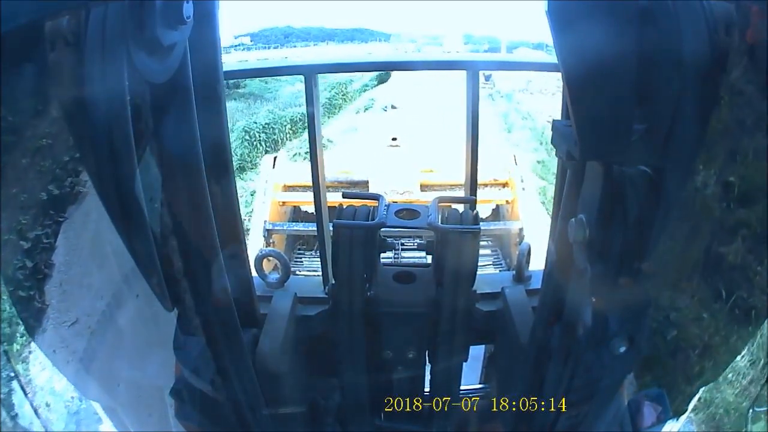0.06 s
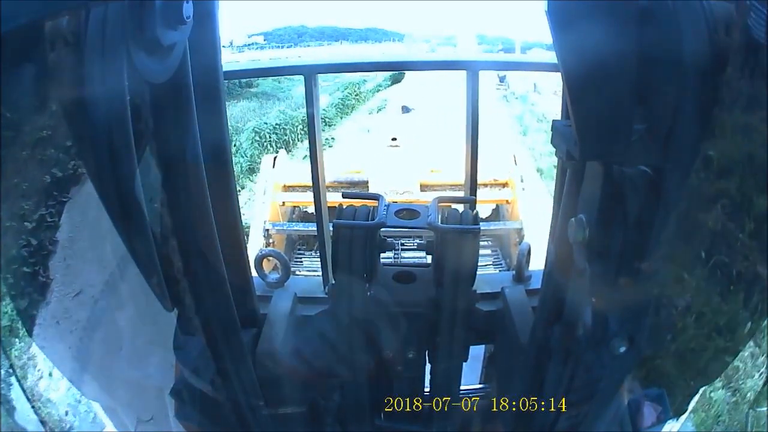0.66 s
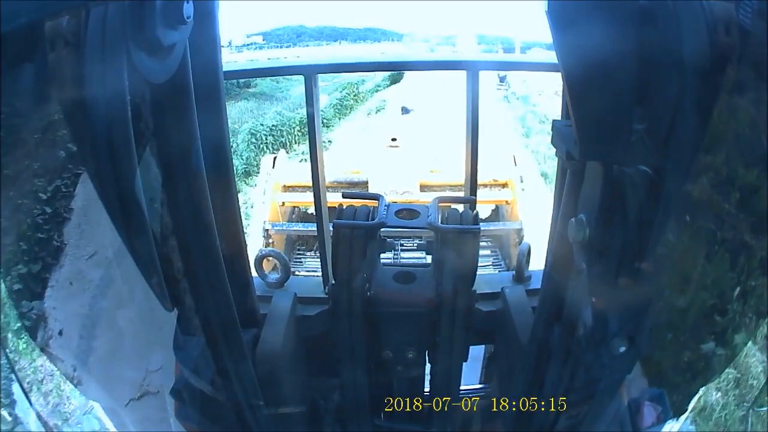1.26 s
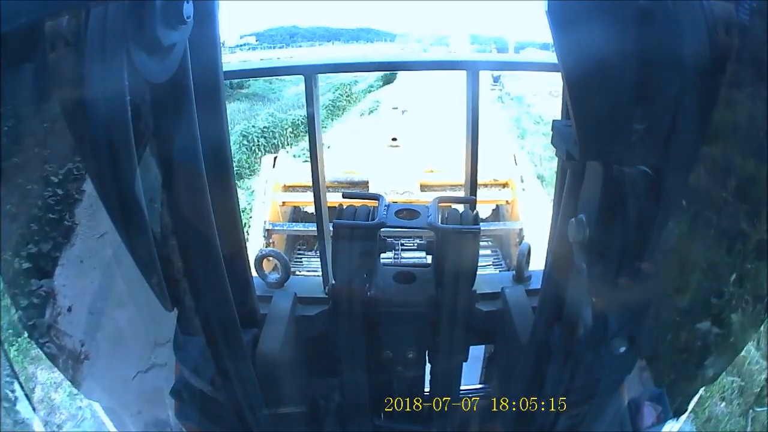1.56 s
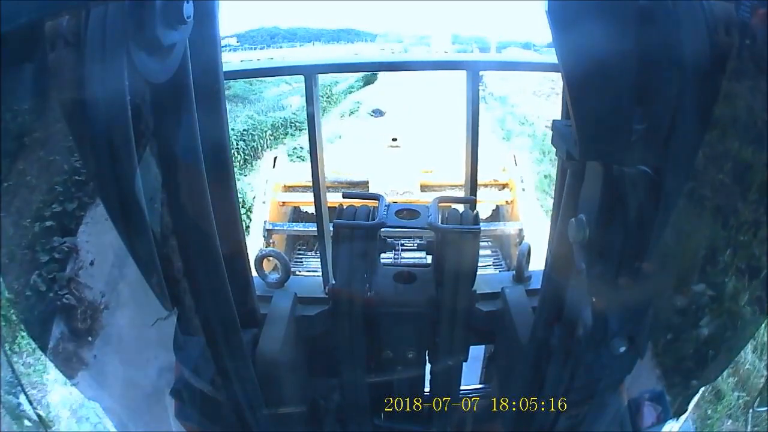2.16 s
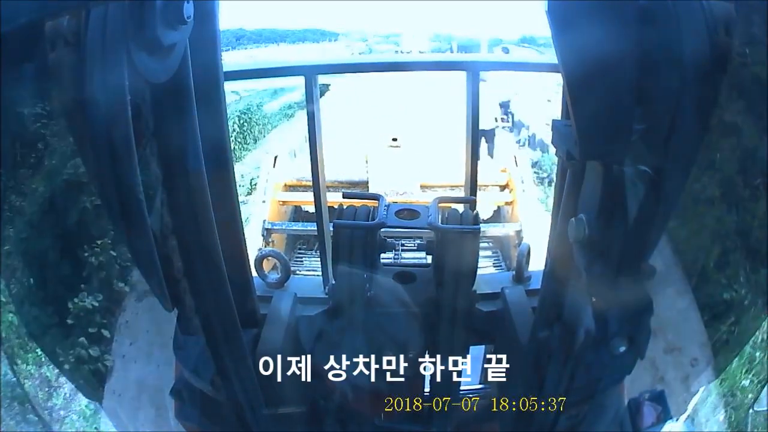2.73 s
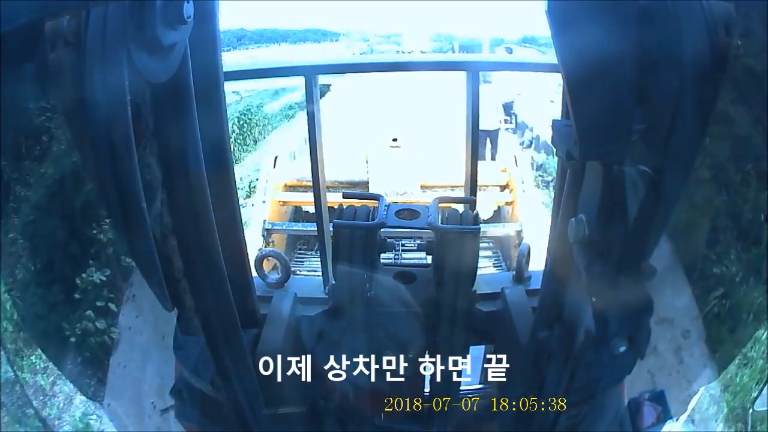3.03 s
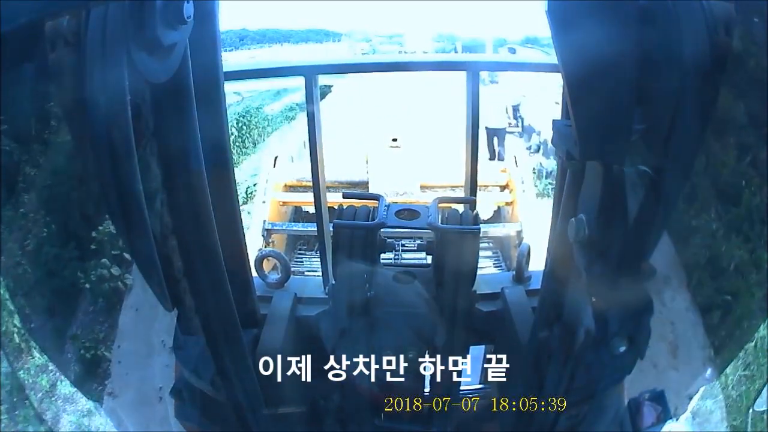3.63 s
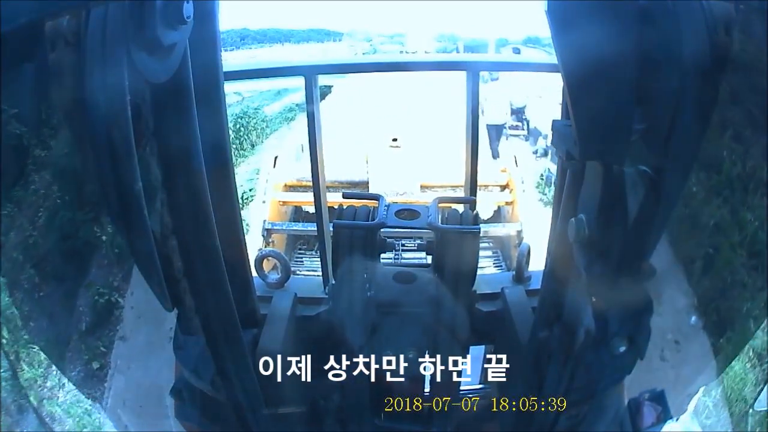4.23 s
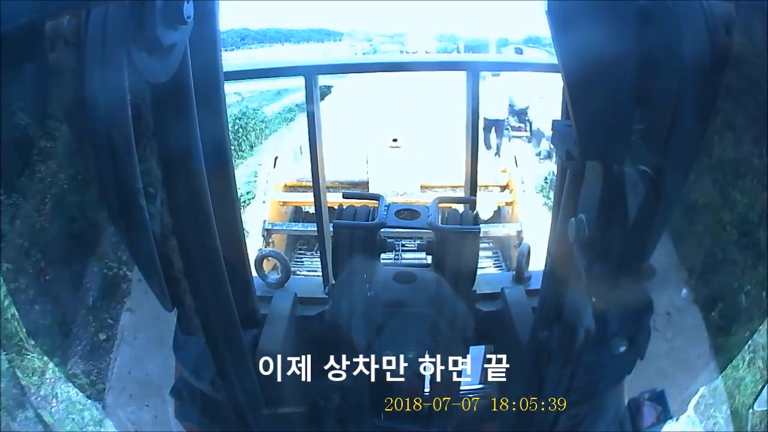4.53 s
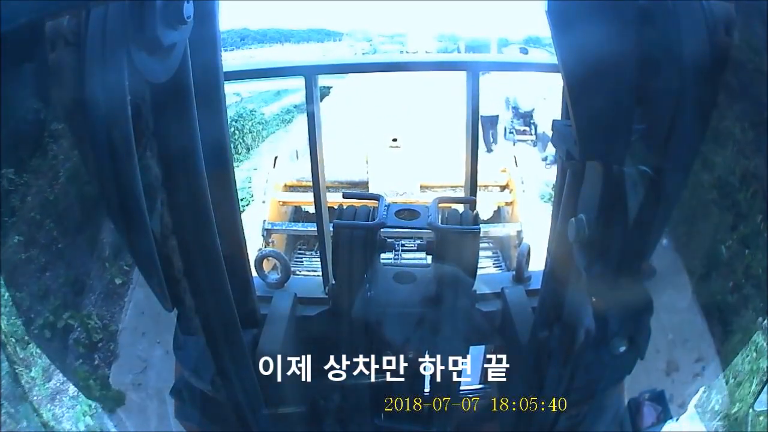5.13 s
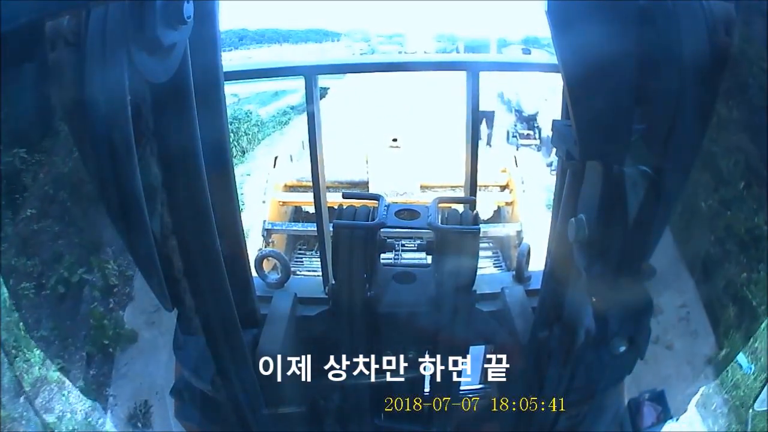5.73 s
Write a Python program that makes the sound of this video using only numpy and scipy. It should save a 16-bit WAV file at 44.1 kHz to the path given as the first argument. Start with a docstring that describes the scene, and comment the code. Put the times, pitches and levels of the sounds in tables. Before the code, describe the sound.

Steady diesel drone, rattle and tyre rumble aboard a moving forklift, with faint squeaks, one sharp click and a growing throb.

```python
"""On a lane, in the driver's seat of a forklift whose four-cylinder diesel pulls at about 1600 rpm.
Low crank orders (harmonics of the shaft's rotation) boom in the frame and beat three times a second;
from about three seconds on, this throb grows stronger. Impacts rattle the block in a pattern that
partly repeats every two turns; tyres rumble, gears whine, a fan drones and the mast squeaks.
A small microphone passes little above 4 kHz; only one sharp click keeps its treble."""
import sys
import numpy as np
from scipy import signal
from scipy.fft import rfft, irfft
from scipy.io import wavfile
from scipy.ndimage import uniform_filter1d

SR = 44100
rng = np.random.default_rng(int(sys.argv[2]) if len(sys.argv) > 2 else 0)


def file_out(sig):
    """Save sig as 16-bit WAV at sys.argv[1]."""
    # one column per channel
    cols = np.atleast_2d(sig).T
    # limit, then scale
    lim = np.clip(cols, -1, 1)
    pcm = np.round(lim * 32767).astype(np.int16)
    wavfile.write(sys.argv[1], SR, pcm)


N = 259308
TIME = np.arange(N) / SR

# rotation of the crankshaft: (time [s], speed [turns/s])
CRANK_SPEED = [(0, 26.01), (0.3, 26.03), (0.8, 26.71), (1.25, 27.1), (1.65, 26.66), (2.07, 27.32),
               (2.35, 27.08), (2.67, 27.24), (2.9, 26.62), (3.4, 26.7), (4.1, 26.61), (4.45, 26.74),
               (5.05, 26.54), (5.6, 26.68), (5.88, 26.49)]
# strong crank orders: (time [s], order 2 level [dB], order 3 level [dB], order 5 level [dB])
BOOM_LEVELS = [(0.0, -16, -40, -19), (0.45, -20.5, -30.2, -20), (0.8, -15.4, -29.5, -19.5),
               (1.15, -14, -21.5, -17), (1.6, -19, -31.5, -20.5), (2.05, -17.5, -16.5, -15),
               (2.45, -27, -22, -16.5), (3.05, -19.3, -14.5, -15), (4.4, -18, -15.8, -15.5),
               (5.0, -20, -18, -15.5), (5.88, -15.5, -14, -16)]
# tones beside the orders: (crank order, side [-1 below, 1 above], relative level [dB], swell delay [s])
BEAT_TONES = [(3, 1, -22.5, 0), (3, -1, -28, -.04), (6, 1, -26, .08), (6, -1, -25.5, .09),
              (8, 1, -32, -.03), (8, -1, -33, -.03)]
# effect of engine load: (time [s], clatter level [dB], rumble level [dB], hum gain [dB])
LOAD_LEVELS = [(0, -19, -20.5, -4.5), (.7, -18, -19, -6.5), (1.5, -18.5, -19, -3), (2.4, -18.5, -20, -2.5),
               (2.9, -18.5, -19.5, -0.5), (4.2, -19, -19, -1), (5.88, -18.5, -18.5, -0.5)]
# weaker crank orders: panel vibrations, and at orders 29, 30 and 43 further gear lines: (crank order, relative
# level [dB])
HUM_ORDERS = [(1, -31), (4, -31.5), (8, -33.5), (10, -27.5), (12, -34), (29, -40.5), (30, -34.5), (43, -35),
              (80, -50)]
# impacts within one turn: (position [turns], half-width [turns], relative level [dB])
IMPACTS = [(.4, 0.11, -10), (0.652, .12, -7)]
# broad response of the block and its covers: (frequency [Hz], relative level [dB])
BLOCK_SPECTRUM = [(200, -21), (400, -11.5), (500, 1.5), (650, -6.5), (820, -2), (950, -3), (1110, 0),
                  (1420, -0.5), (1720, -6), (1860, -17), (2170, -13), (2400, -24), (2800, -23),
                  (3300, -29.5)]
# resonances of the gear cover and other thin steel: (frequency [Hz], bandwidth [Hz], gain [dB])
COVER_MODES = [(794, 20, 2), (1086, 63, 6), (1135, 34, 0.5), (1373, 59, 3), (2800, 90, 3.5)]
# tyre and frame noise: (frequency [Hz], relative level [dB])
RUMBLE_SPECTRUM = [(20, -28), (40, -22), (62, -1), (76, -1), (105, -10), (140, -4), (175, -2), (205, -3),
                   (245, -9), (330, -6), (430, -11), (700, -28.5), (1500, -50.5)]
# whine of the camshaft gear: (time [s], level [dB])
CAM_LEVELS = [(0.0, -24), (0.3, -19.5), (0.8, -24), (1.0, -29.5), (1.3, -25), (1.65, -27), (2.2, -22.5),
              (2.8, -30.5), (3.75, -33), (4.0, -25), (5.0, -30.5), (5.88, -26.5)]
# mast squeaks: (centre time [s], duration [s], start frequency [Hz], end frequency [Hz], level [dB])
MAST_SQUEAKS = [(.657, .09, 722, 732, -22), (.645, .08, 985, 1010, -25), (.825, .11, 715, 675, -27),
                (1.005, .11, 712, 704, -27), (1.7, .1, 760, 720, -30)]
# sharp click: (time [s], peak level before filtering [dB])
CLICK_PULSES = [(2.8035, -4)]


def exhaust_boom(turns, sixth_db=-25):
    """Forced vibration: the exhaust drives the frame at low orders, in phase once a turn."""
    second_db, third_db, fifth_db = curves(BOOM_LEVELS)
    orders = [(2, second_db), (3, third_db), (5, fifth_db), (6, sixth_db)]
    return -np.sqrt(2) * sum(amp(db) * np.sin(2 * np.pi * order * turns) for order, db in orders)


def shaft_throb(turns, uneven_db=3.0):
    """Beating: under load a driven shaft slips, so its tones lie just beside the crank orders."""
    out = 0
    for order, side, db, delay_s in BEAT_TONES:
        cycles = order * turns + side * slip_cycles(turns, delay_s)
        out -= amp(db + uneven_db * walk(3)) * np.sin(2 * np.pi * cycles)
    return np.sqrt(2) * out * throb_gain()


def slip_cycles(turns, delay_s, beats_per_turn=.116, swell_s=4.05):
    """Phase difference: the cycles of slip accumulated, counted from one swell of the beat."""
    return beats_per_turn * (turns - np.interp(swell_s + delay_s, TIME, turns))


def throb_gain(onset_s=3.06, rise_s=.15, faint_db=-17.25, strong_db=-5.75):
    """Modulation depth: the throb is faint at first and stronger from about three seconds on."""
    grown = np.clip((TIME - onset_s) / rise_s + .5, 0, 1)
    return amp(faint_db + (strong_db - faint_db) * grown)


def block_clatter(turns, repeating_share=.45, force_floor=.84, scatter_db=2.0):
    """Impact excitation: valves, injectors and pistons rattle the block, partly alike every two turns."""
    cycle = irfft(np.exp(2j * np.pi * rng.random(1025)))  # every half order equally strong
    loose_turns = turns + .0025 * walk(50)  # play in the parts smears the high orders most
    periodic = np.interp(loose_turns / 2 % 1, np.linspace(0, 1, len(cycle)), cycle)
    rattle = np.sqrt(repeating_share) * steel_response(periodic)
    rattle += np.sqrt(1 - repeating_share) * steel_response(rng.standard_normal(N))
    force = force_floor
    for position, width, db in IMPACTS:
        count, phase = np.divmod(turns - position + .5, 1)
        strength = amp(db + scatter_db * rng.standard_normal(256))[count.astype(int)]
        force += strength * np.exp(-((phase - .5) / width) ** 2)
    return unit(rattle * force)


def steel_response(excitation):
    """Resonance: narrow modes of the covers stand on the broad response of the block; rms 1."""
    freqs = np.fft.rfftfreq(N, 1 / SR)
    modes_db = sum(db / (1 + (2 * (freqs - hz) / width) ** 2) for hz, width, db in COVER_MODES)
    return colour(irfft(rfft(excitation) * amp(modes_db), N), BLOCK_SPECTRUM)


def tyre_rumble(turns, depth=.35, lag_turns=.13):
    """Amplitude-modulated noise: tyres and loose panels drone, shaken just after each firing."""
    shake = 1 + depth * np.cos(4 * np.pi * (turns - lag_turns))
    return unit(colour(rng.standard_normal(N), RUMBLE_SPECTRUM) * shake)


def panel_hum(turns, flutter_db=2):
    """Harmonics of a periodic force: each jolt buzzes the panels in step with the boom; the high orders add
    faint gear lines."""
    return -np.sqrt(2) * sum(amp(db + flutter_db * walk(6)) * np.sin(2 * np.pi * order * turns)
                             for order, db in HUM_ORDERS)


def gear_whine(turns, load_db, cam_mesh_order=19.5, pump_mesh_order=40):
    """Tooth meshing: each gear sounds at its contact rate, and running off centre makes it swell."""
    cam_db, = curves(CAM_LEVELS)
    pump_db = -26.5 + .85 * load_db
    angle = turns + .0003 * walk(40)  # backlash blurs the pitch
    cam = tone(angle, cam_mesh_order) * (1 + .42 * tone(turns, order=1))  # one swell a turn
    pump = tone(angle, pump_mesh_order) * (1 + .25 * tone(turns, order=2))  # one swell a firing
    return amp(cam_db) * cam + amp(pump_db) * pump


def fan_drone(turns, blade_order=6.87, slip_turns=.013):
    """Blade-passing tone: the belt-driven fan sounds between crank orders, with a sideband each side."""
    angle = turns + slip_turns * walk(5.7)
    return sum(amp(db) * tone(angle, blade_order + side) for side, db in [(-1, -37), (0, -26), (1, -33)])


def mast_squeaks(waver_hz=4):
    """Friction-excited vibration: dry steel slides for a moment and sings one wavering note."""
    out = np.zeros(N)
    for centre_s, duration_s, start_hz, end_hz, db in MAST_SQUEAKS:
        progress = np.clip((TIME - centre_s) / duration_s + .5, 0, 1)
        hz = start_hz + (end_hz - start_hz) * progress + waver_hz * walk(90)
        envelope = amp(db) * np.sin(np.pi * progress)
        out += envelope * np.sqrt(2) * np.sin(2 * np.pi * np.cumsum(hz) / SR)
    return out


def click(decay_s=.00028):
    """A brief pulse has a broad spectrum: one sharp click, short and bright, that does not ring."""
    return sum(-amp(db) * (TIME >= s) * np.exp(-np.abs(TIME - s) / decay_s) for s, db in CLICK_PULSES)


def amp(db):
    """Amplitude ratio of a level in decibels."""
    return 10 ** (np.asarray(db) / 20)


def unit(x):
    """Normalisation to rms 1."""
    return x / np.sqrt(np.mean(x ** 2))


def curves(table):
    """Linear interpolation of each column of a time table, sample by sample."""
    times, *columns = np.transpose(table)
    return [np.interp(TIME, times, column) for column in columns]


def colour(x, spectrum):
    """Spectral shaping by points of (frequency [Hz], level [dB]); rms 1."""
    hz, db = np.transpose(spectrum)
    freqs = np.fft.rfftfreq(N, 1 / SR)
    gain = amp(np.interp(np.log(freqs + 1), np.log(hz), db))
    return unit(irfft(rfft(x) * gain, N))


def walk(rate_hz):
    """Smooth random fluctuation that changes about rate_hz times a second; rms 1."""
    hold = max(int(SR / rate_hz), 2)
    steps = rng.standard_normal(4096)[(np.arange(N) // hold) % 4096]
    return unit(uniform_filter1d(uniform_filter1d(steps, hold), hold))


def tone(turns, order):
    """Phase locking: a sine at a multiple of the rotation rate, with a random start; rms 1."""
    return np.sqrt(2) * np.sin(2 * np.pi * (order * turns + rng.random()))


def scene(start_turn=.525, jolt_db=.52):
    """Superposition: the engine's sounds follow the crank angle; the uneven lane sways the noise level."""
    speed, = curves(CRANK_SPEED)
    turns = start_turn + np.cumsum(speed * (1 + .0008 * walk(14))) / SR
    clatter_db, rumble_db, hum_db = curves(LOAD_LEVELS)
    # the rumble heaves with the throb
    heave_db = 2 * throb_gain() * np.cos(2 * np.pi * slip_cycles(turns, delay_s=.06))
    tones = exhaust_boom(turns) + shaft_throb(turns) + gear_whine(turns, hum_db)
    tones += amp(hum_db) * (panel_hum(turns) + fan_drone(turns))
    noises = amp(clatter_db) * block_clatter(turns) + amp(rumble_db + heave_db) * tyre_rumble(turns)
    return (tones + amp(jolt_db * walk(11)) * noises + mast_squeaks())[None]


def record(dry, band_hz=3850, top_hz=15850):
    """Clipping and band limiting: the microphone overloads and cuts treble; the click stays bright."""
    overloaded = np.clip(dry, -.995, .995)
    narrow = signal.sosfiltfilt(signal.ellip(10, .05, 70, band_hz, fs=SR, output="sos"), overloaded)
    clipped = np.clip(narrow + click(), -1, 1)  # overshoots tick faintly
    return signal.sosfilt(signal.ellip(8, .2, 70, top_hz, fs=SR, output="sos"), clipped)


dry = scene()
out = record(dry)
file_out(out)
```